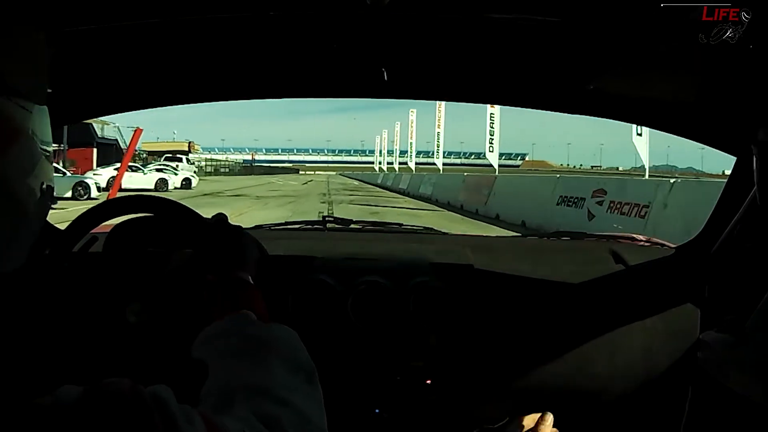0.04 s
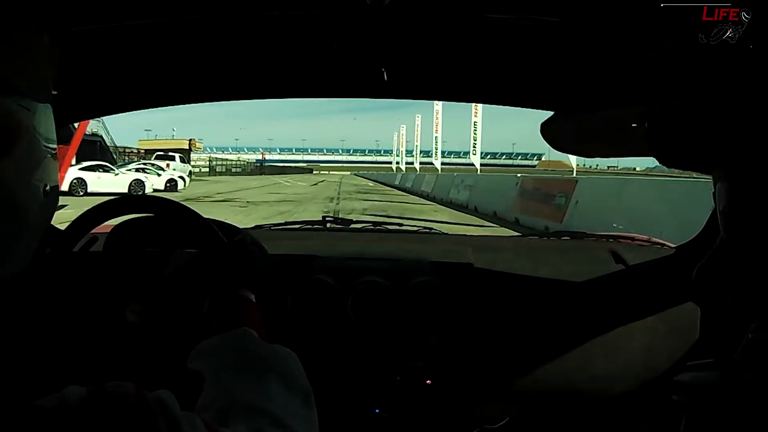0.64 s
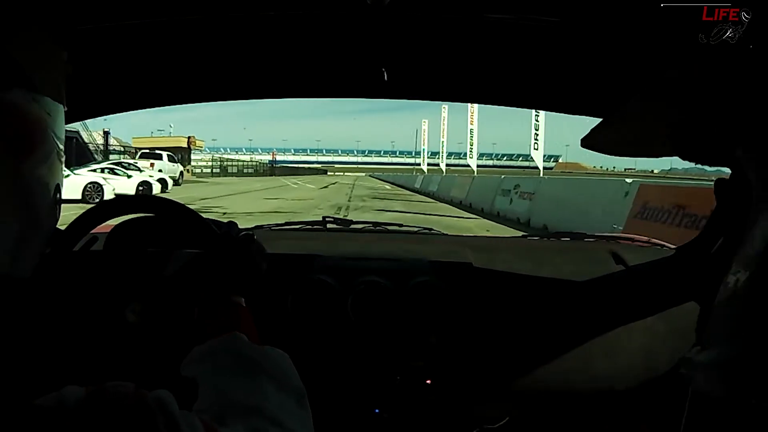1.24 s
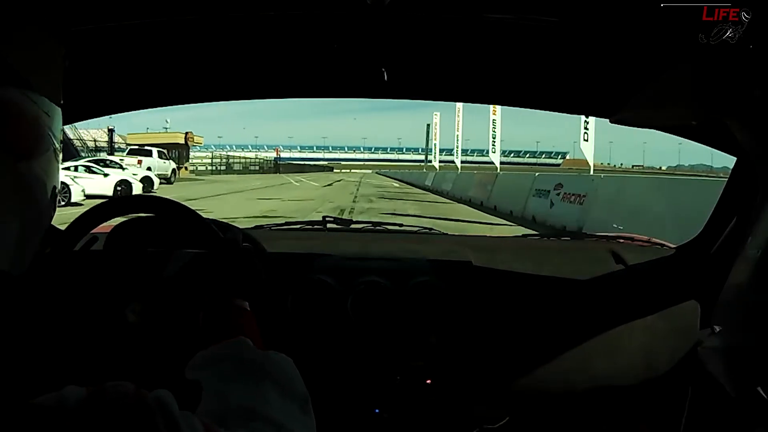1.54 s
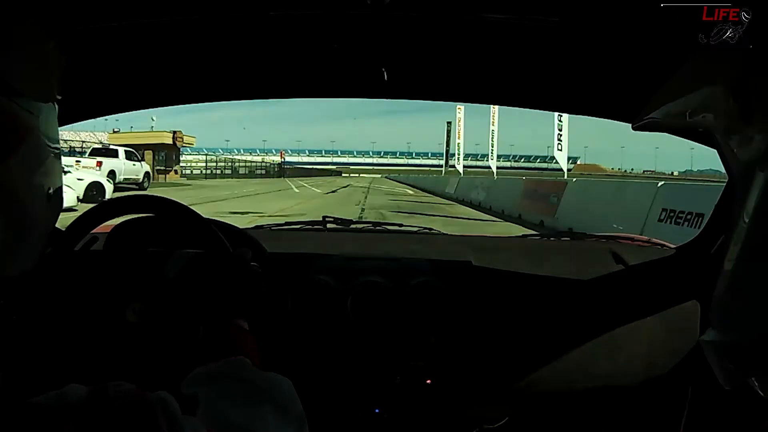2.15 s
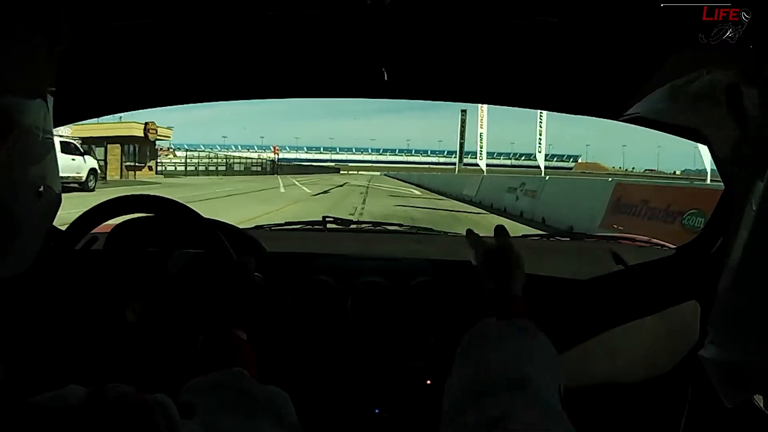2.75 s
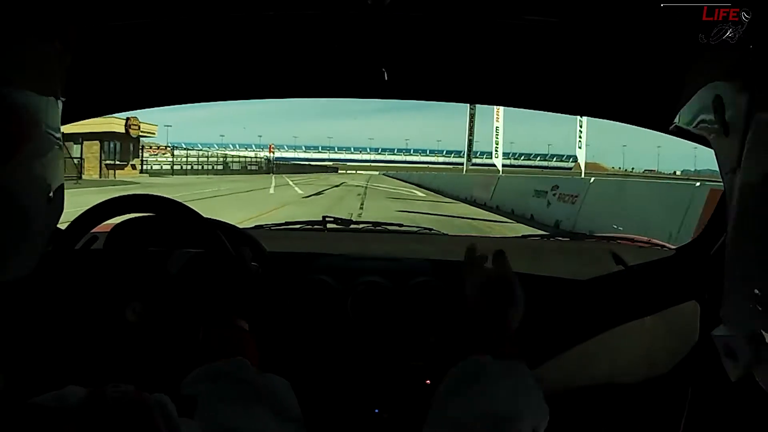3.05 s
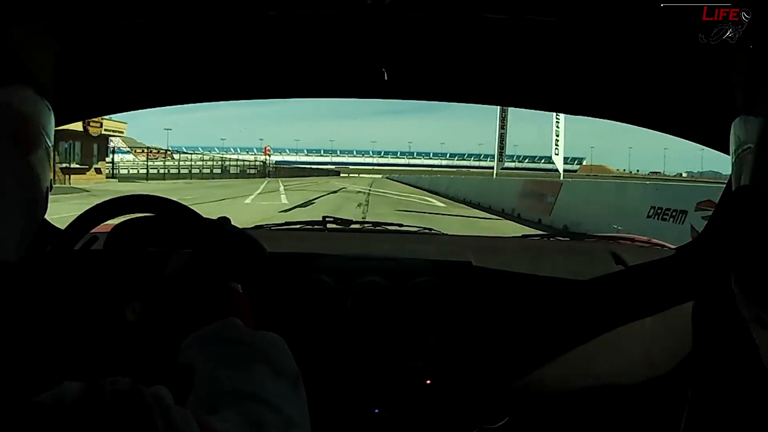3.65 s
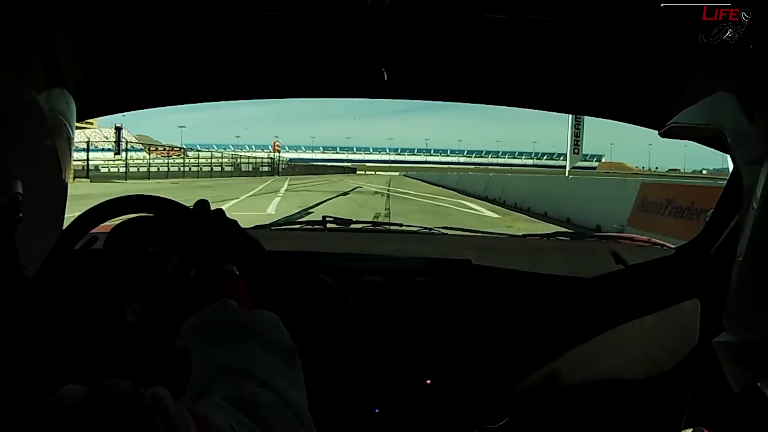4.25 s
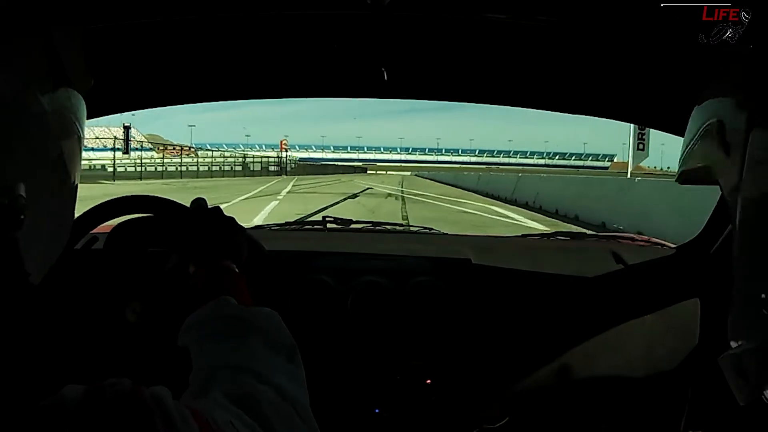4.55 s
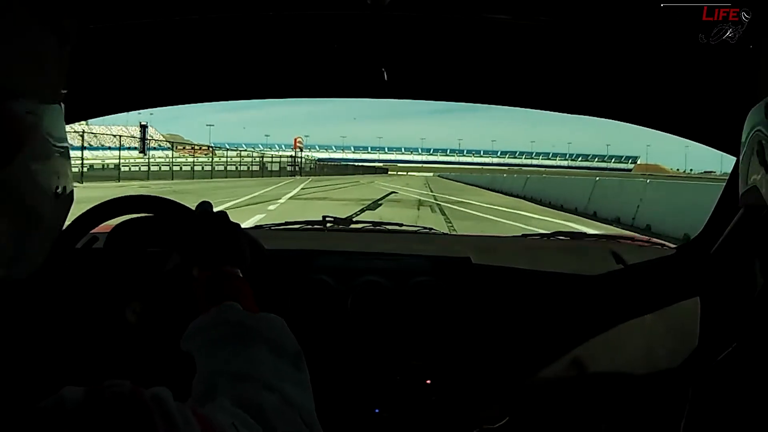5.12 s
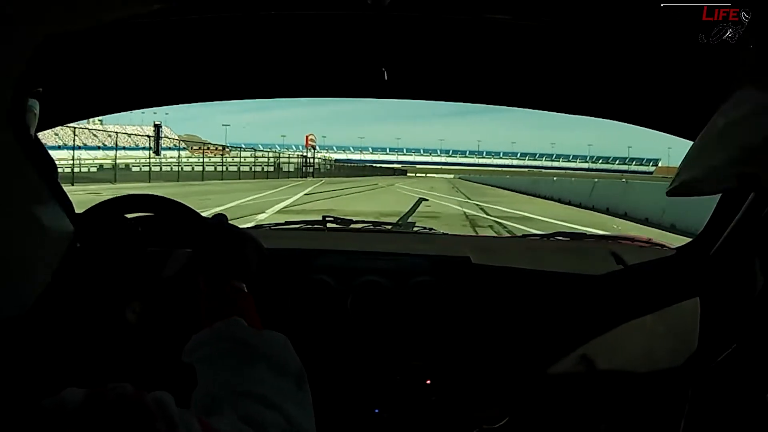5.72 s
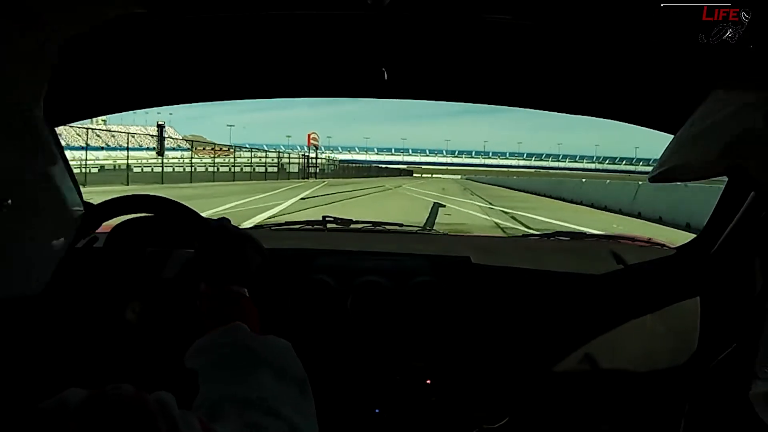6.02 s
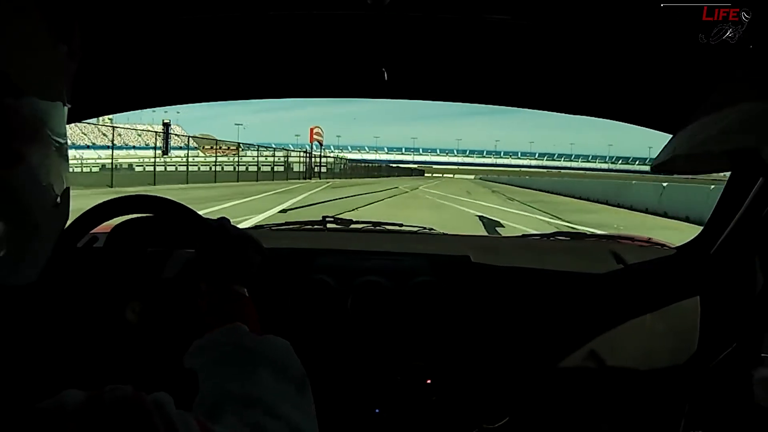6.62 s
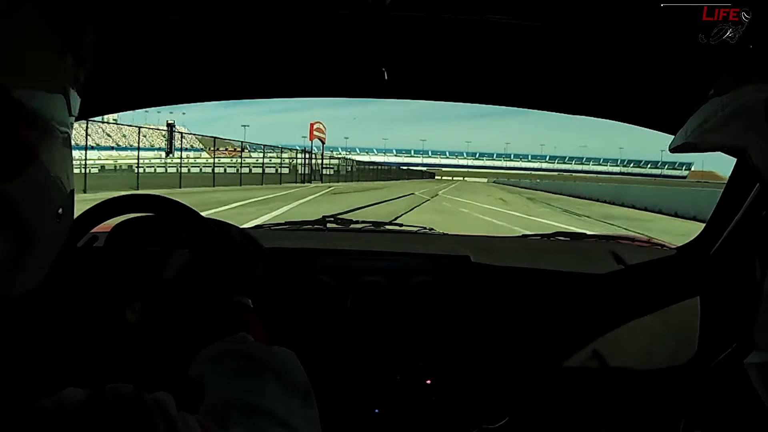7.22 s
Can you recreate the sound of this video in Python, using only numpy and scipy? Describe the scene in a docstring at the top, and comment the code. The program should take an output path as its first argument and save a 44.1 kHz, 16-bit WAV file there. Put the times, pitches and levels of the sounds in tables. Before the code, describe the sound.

A loud V8 race car engine is heard from inside the cabin, booming and rasping as it overloads the microphone. For the first second its pitch rises steadily, with a brief whine on top. At about 1 second comes an upshift: a short puff of air, a hollow hoot from the exhaust and a few dull knocks as the pitch drops sharply. The revs shudder around 1.4 seconds and settle into a lower drone. From there the engine climbs slowly, over a low road rumble that grows with speed and a fine buzz and hiss. Around 4.5 seconds the throttle eases for a moment and the chassis takes a few soft bumps. The revs then rise again, and from about 6.5 seconds a ringing panel howl and whine swell, with the engine still pulling at 7.5 seconds.

```python
"""A rasping V8 boom climbs in pitch, heard inside a race car rolling down a pit lane.
The revs drop with a hoot at an upshift, shudder, then climb again. Each crank order swells as it
passes a cabin resonance, over exhaust pulses, combustion roar and road rumble. These overload the
microphone, which squares the wave off into a rasp; a panel howl, a whine, buzz and hiss ride on top."""
import sys
import numpy as np
from scipy import signal
from scipy.fft import rfft, irfft, next_fast_len
from scipy.io import wavfile
from scipy.ndimage import uniform_filter1d, map_coordinates

SR = 44100
rng = np.random.default_rng(int(sys.argv[2]) if len(sys.argv) > 2 else 0)


def master_out(mix):
    """Clip the mix to full scale and print it as 16-bit PCM to the path in sys.argv[1]."""
    frames = np.transpose(np.atleast_2d(mix))
    ceiling = np.clip(frames, -1, 1)
    pcm = np.round(ceiling * 32767).astype(np.int16)
    wavfile.write(sys.argv[1], SR, pcm)


N = 329427

# how hard the engine works: (time [s], relative level [dB])
ENGINE_EFFORT = [(0, -41.5), (.3, -35.5), (.9, -41), (1.07, -34.5), (1.29, -37), (1.42, -51.5),
                 (1.8, -44.5), (2.2, -43), (2.9, -52), (3.6, -42.5), (4.45, -54), (4.9, -48), (6.2, -46.5),
                 (6.9, -39.5), (7.47, -38.5)]
# spectrum of the fizz and the air puff: (frequency [Hz], relative density [dB])
HISS_SPECTRUM = [(300, -11), (1500, 5), (3000, 2), (6000, -2.5), (9000, -17)]
SHIFT_START_S, SHIFT_LENGTH_S = .98, .38


def engine(rate, firings):
    """Superposition: pulses and roar grow with effort; the boom sags at the shift and a throttle lift."""
    effort_db = effort()
    pulses = amp(-22 + 1.26 * effort_db) * exhaust(firings, uneven=3.04, scatter=.3)
    gas = amp(-16 + .48 * effort_db) * roar(firings, throb=.2)
    sag_db = -7 * shifting() - 7 * swell(4.56, half_s=.23)
    return amp(sag_db) * boom(rate, firings, waver_db=1.56) + pulses + gas


def revs(flutter, shift_flutter):
    """Frequency modulation: the firing rate flutters, with a damped driveline shudder as the gear bites."""
    # four firings a crank turn: (time [s], base firing rate [Hz])
    firing_rate = [(0, 197.4), (.12, 199.3), (.25, 206.8), (.47, 215.3), (.97, 227.8), (1.1, 218.7),
                   (1.2, 176.9), (1.325, 153.5), (1.85, 157.2), (2.38, 162.3), (2.64, 165.9), (3.15, 170.3),
                   (3.5, 173.4), (4.1, 180.1), (4.55, 177.8), (5.1, 179.4), (6.1, 192.9), (7.47, 207.5)]
    bite_s, shudder_hz, swing_hz, decay_s = 1.325, 4.9, 15, .21
    t = np.maximum(np.arange(N) / SR - bite_s, 0)
    shudder = swing_hz * np.sin(2 * np.pi * shudder_hz * t) * np.exp(-t / decay_s)
    unsteadiness = (flutter + shift_flutter * shifting()) * wobble(25)
    return (curve(firing_rate) - shudder) * (1 + unsteadiness)


def boom(rate, firings, waver_db):
    """Forced resonance: each strong crank order swells as it passes a mode of the cabin."""
    # strong harmonics of the crank: (order [cycles a turn], relative level [dB])
    crank_orders = [(2, -0.5), (4, 0.5), (5, -15), (6, 0), (7, -12.5), (8, -2), (9, -14), (10, -6.5)]
    # cabin resonances: (frequency [Hz], width before cubing [Hz], gain [dB])
    cabin_modes = [(88.57, 9, -18.5), (100.5, 18.4, -5.5), (153.6, 38.3, -7.5), (181.2, 24.9, -9),
                   (200, 21.2, -13), (224.9, 17.6, -7), (242.43, 17.8, -10.5), (260.3, 12.15, -10),
                   (296.6, 20, -16.5), (319, 13.2, -12), (328.7, 6.8, -11.5), (394.1, 38, -8),
                   (434.1, 16, -12)]
    grid_hz = np.arange(1000)
    response = sum(amp(db) * np.abs(resonance(grid_hz, hz, width)) ** 3 for hz, width, db in cabin_modes)
    out = np.zeros(N)
    for order, db in crank_orders:
        multiple = order / 4  # of the firing rate
        dispersion = 2.5 * np.pi * multiple ** 2  # the pipes smear each pulse, so overtones peak apart
        gain = np.interp(multiple * rate, grid_hz, response) * amp(db + waver_db * wobble(18))
        out += gain * np.sqrt(2) * np.cos(2 * np.pi * multiple * firings + dispersion)
    return out


def exhaust(firings, uneven, scatter):
    """Source and filter: one pulse a firing excites the pipe; unequal cylinders add the odd orders."""
    # broad response of the pipe: (frequency [Hz], relative gain [dB])
    pipe_response = [(30, -35.5), (90, -0.5), (150, -5.5), (235, 7.5), (330, -1.5), (440, -1.5), (690, -4),
                     (900, -10.5), (1300, -12), (2500, -35), (5000, -50)]
    # narrow pipe resonances: (frequency [Hz], width [Hz], relative gain [dB])
    pipe_modes = [(551.4, 26, 9), (810, 55, 8.5), (1011, 63, 8)]
    onsets = np.flatnonzero(np.diff(np.floor(firings)))
    imbalance = np.resize([.7, -.24, -.19, -.16], len(onsets))  # repeats every crank turn
    pulses = np.zeros(N)
    pulses[onsets] = 1 + uneven * imbalance + scatter * rng.standard_normal(len(onsets))
    peaks = lambda f: 1 + sum(amp(db) * resonance(f, hz, width) for hz, width, db in pipe_modes)
    return unit(filtered(coloured(pulses, pipe_response), peaks))


def roar(firings, throb):
    """Amplitude modulation: turbulent gas noise puffs with every firing."""
    # combustion noise: (frequency [Hz], relative density [dB])
    gas_spectrum = [(30, -33), (70, -3.5), (130, -3), (250, -1.5), (500, -3.5), (1000, -11), (2000, -20),
                    (4000, -33.5), (9000, -86)]
    puffs = 1 + throb * np.cos(2 * np.pi * firings)
    return unit(coloured(puffs * rng.standard_normal(N), gas_spectrum))


def hoot(hz, arch_hz, db, waver_db):
    """Pipe resonance: the exhaust sounds its own note through the shift, arching up to hz and back."""
    across = np.clip(2 * (np.arange(N) / SR - SHIFT_START_S) / SHIFT_LENGTH_S - 1, -1, 1)
    pitch_hz = hz - arch_hz * across ** 2
    level = shifting() * amp(db + waver_db * wobble(50))
    return level * np.sqrt(2) * np.sin(2 * np.pi * np.cumsum(pitch_hz) / SR)


def overloaded(x, ceiling_db, hardness):
    """Saturation: the microphone flattens both sides of the wave, adding a rasp."""
    return x / (1 + np.abs(x / amp(ceiling_db)) ** hardness) ** (1 / hardness)


def howl(cabin, hz, width_hz, rest_db):
    """Sympathetic vibration: a panel rings throughout, with surges set where order 8 sweeps through it."""
    # surges of the panel: (time [s], gain [dB], half-length [s])
    surges = [(0.316, -3, 0.2), (6.97, 7.5, .34), (7.145, 7.5, 0.06), (7.288, 8, 0.075)]
    gain = amp(rest_db) + sum(amp(db) * swell(s, half_s) for s, db, half_s in surges)
    return gain * filtered(cabin, lambda f: resonance(f, hz, width_hz))


def road(start_db, rise_db_per_s, wander_db):
    """Structure-borne sound: the stiff chassis rumbles more as speed grows and rings at each jolt."""
    # chassis rumble: (frequency [Hz], relative density [dB])
    rumble_spectrum = [(10, -32), (25, -8), (34, -8), (44, -1.5), (58, -12.5), (100, -9), (200, -34.5),
                       (500, -57)]
    # rough patches of tarmac: (time [s], level [dB])
    rough_patches = [(1.82, -17), (2.1, -17.5), (2.839, -16), (4.0, -18), (4.249, -19), (5.419, -20.5),
                     (6.2, -19), (6.949, -23)]
    # knocks from the gear change and road seams: (time [s], level [dB], pitch [Hz], 60 dB decay [s])
    jolts = [(1.135, -6, 102, .15), (1.31, -10, 55, .15), (1.57, -9, 75, .2), (4.51, -13, 48, .1),
             (4.575, -10, 240, .12), (4.67, -12, 42, .25)]
    level = amp(start_db + rise_db_per_s * np.arange(N) / SR + wander_db * wobble(5))
    level += sum(amp(db) * swell(s, half_s=.06) for s, db in rough_patches)
    out = level * unit(coloured(rng.standard_normal(N), rumble_spectrum))
    for s, db, hz, t60 in jolts:
        t = np.maximum(np.arange(N) / SR - s, 0)
        out += amp(db) * np.sin(2 * np.pi * hz * t) * np.exp(-np.log(1000) * t / t60)
    return out


def whine(hz, drift_hz):
    """Interference: a nearly steady tone beats with order 8 when the revs carry that order past it."""
    # swells of the cabin whine: (time [s], level [dB], half-length [s])
    swells = [(0.278, -22, 0.24), (2.4, -32.5, .35), (4.699, -31, .25), (7.202, -28, 0.35)]
    level = sum(amp(db) * swell(s, half_s) for s, db, half_s in swells)
    pitch_hz = hz + drift_hz * wobble(8.1)
    return level * unit(np.sin(2 * np.pi * np.cumsum(pitch_hz) / SR))


def buzz(firings, level_db, effort_power, uneven, waver_db):
    """Forced vibration: body panels, kicked unequally by the two banks, pick out upper even orders."""
    # body panel resonances: (frequency [Hz], width before squaring [Hz], relative gain [dB])
    panel_modes = [(474, 19, -4.5), (526.9, 24, -1.5), (543, 11, 4), (693.5, 49, -2.5), (816, 47, -1),
                   (1001, 30, -5)]
    kicks = np.diff(np.floor(firings), prepend=0) * (1 + uneven * np.cos(np.pi * firings))
    panels = lambda f: sum(amp(db) * resonance(f, hz, width) ** 2 for hz, width, db in panel_modes)
    level = amp(level_db + effort_power * effort() + waver_db * wobble(5))
    return level * unit(filtered(kicks, panels))


def puff(s, half_s, db):
    """Turbulence: a short hiss of air as the gear comes out."""
    return amp(db) * swell(s, half_s) * unit(coloured(rng.standard_normal(N), HISS_SPECTRUM))


def fizz(cabin, db, steady):
    """Modulation noise: a fine hiss flares on each steep edge of the flattened wave."""
    edges = unit(uniform_filter1d(np.abs(np.gradient(cabin)), size=110))
    return amp(db) * (steady + edges) * unit(coloured(rng.standard_normal(N), HISS_SPECTRUM))


def shifting(attack_s=.04, release_s=.12):
    """Trapezoidal envelope of the gear change, 0 to 1."""
    t = np.arange(N) / SR - SHIFT_START_S
    return np.clip(np.minimum(t / attack_s, (SHIFT_LENGTH_S - t) / release_s), 0, 1)


def effort():
    """Engine effort in decibels about its mean."""
    db = curve(ENGINE_EFFORT)
    return db - np.mean(db)


def swell(s, half_s):
    """Gaussian envelope centred on time s."""
    return np.exp(-((np.arange(N) / SR - s) / half_s) ** 2)


def curve(rows):
    """Linear interpolation of (time, value) rows at every sample."""
    times, values = np.transpose(rows)
    return np.interp(np.arange(N) / SR, times, values)


def wobble(rate):
    """Smooth random modulation, rate knots a second."""
    knots = rng.standard_normal(int(N * rate / SR) + 4)
    return map_coordinates(knots, [np.arange(N) * rate / SR])


def resonance(f, hz, width_hz):
    """Response of a damped oscillator, 1 at its centre."""
    return 1j * f * width_hz / (hz ** 2 - f * f + 1j * f * width_hz)


def filtered(x, response):
    """Linear filtering: the spectrum of x times a complex response of frequency."""
    size = next_fast_len(N + SR // 2)
    return irfft(rfft(x, size) * response(np.fft.rfftfreq(size, 1 / SR)), size)[:N]


def coloured(x, points, size=16384):
    """Minimum-phase filtering through (frequency [Hz], gain [dB]) points on a log axis."""
    hz, db = np.transpose(points)
    gain = amp(np.interp(np.log(np.fft.rfftfreq(size, 1 / SR) + 1), np.log(hz), db))
    cepstrum = irfft(np.log(gain))
    cepstrum[1:size // 2] *= 2  # folding onto positive time makes the filter causal
    cepstrum[size // 2 + 1:] = 0
    impulse_response = irfft(np.exp(rfft(cepstrum)))
    return signal.fftconvolve(x, impulse_response)[:N]


def amp(db):
    """Decibels to amplitude ratio."""
    return 10 ** (np.asarray(db) / 20)


def unit(x):
    """Normalisation to rms 1."""
    return x / np.sqrt(np.mean(x ** 2) + 1e-20)


def scene():
    """Engine, hoot and road saturate together; howl, whine, buzz and hiss add by superposition."""
    rate = revs(flutter=.002, shift_flutter=.03)
    firings = np.cumsum(rate) / SR  # phase, counted in firings
    pressure = engine(rate, firings) + hoot(hz=264, arch_hz=20, db=-4.5, waver_db=5)
    pressure += road(start_db=-23.5, rise_db_per_s=1.06, wander_db=1.5)
    cabin = overloaded(pressure, ceiling_db=-17.5, hardness=16)
    tones = howl(cabin, hz=408.2, width_hz=12, rest_db=-6) + whine(hz=400.6, drift_hz=1.492)
    tones += buzz(firings, level_db=-38.5, effort_power=.34, uneven=.35, waver_db=1.5)
    hiss = puff(s=1.075, half_s=.035, db=-30) + fizz(cabin, db=-40, steady=.18)
    return (cabin + tones + hiss)[None]


def record(dry):
    """Frequency response: the microphone colours the sound, notches the treble and limits the band."""
    # the microphone's colour: (frequency [Hz], gain [dB])
    mic_response = [(5, -6.5), (20, 0.5), (100, -0.5), (280, 0), (400, -1), (560, -2), (1000, -2.5),
                    (2000, -7), (3000, -9.5), (5000, -11.5), (7000, -11.5), (9000, -17), (10000, -29.5),
                    (11000, -38)]
    low_hz, top_hz = 2, 11500
    notch = lambda f: 1 - resonance(f, hz=3985, width_hz=4920)
    band = lambda f: 1j * f / (low_hz + 1j * f) * (f < top_hz)
    return filtered(coloured(dry[0], mic_response), lambda f: notch(f) * band(f))[None]


dry = scene()
out = record(dry)
master_out(out)
```